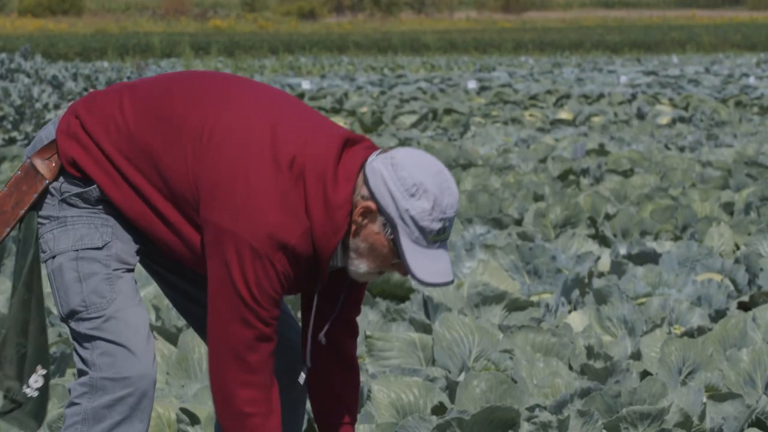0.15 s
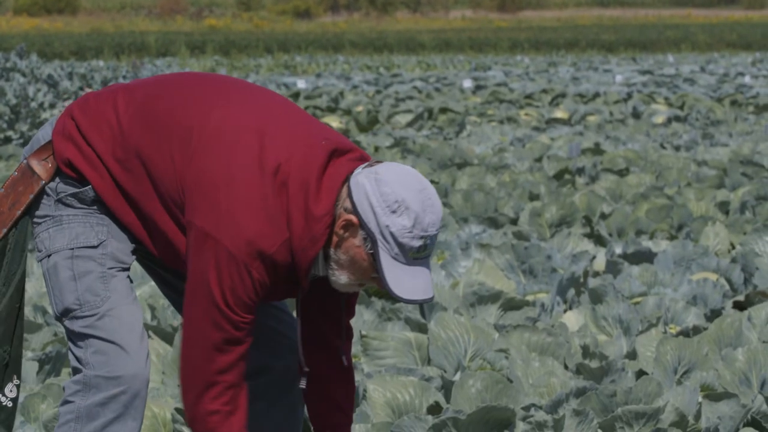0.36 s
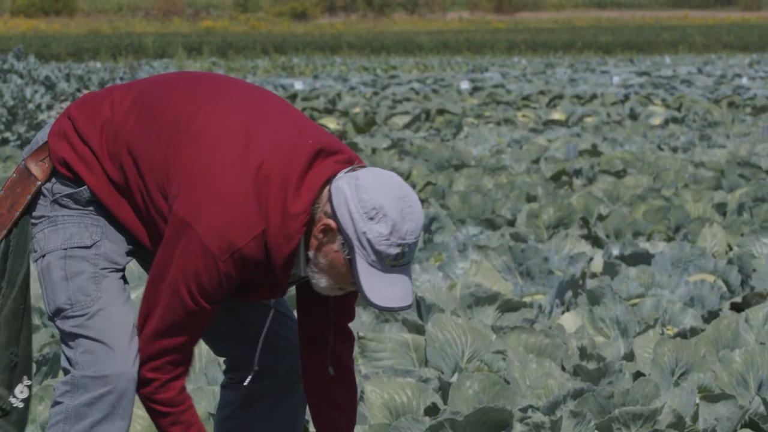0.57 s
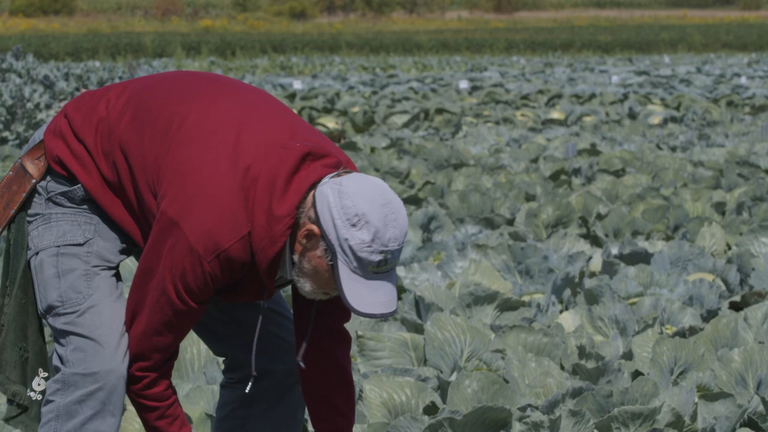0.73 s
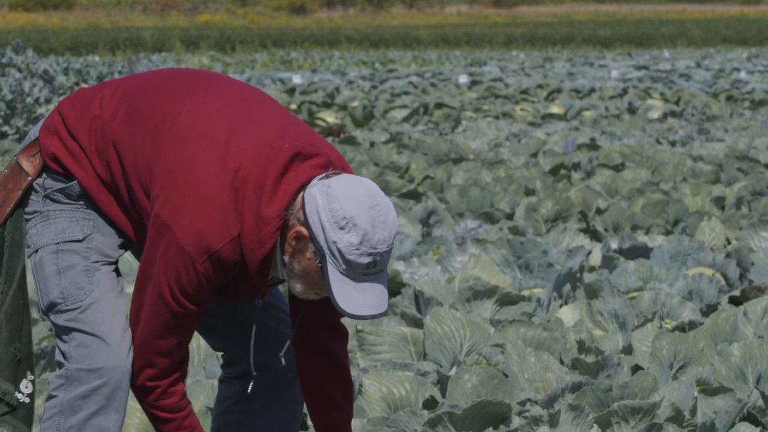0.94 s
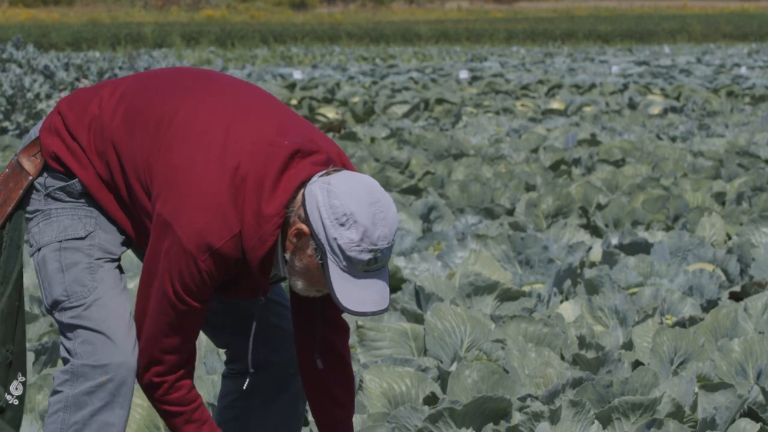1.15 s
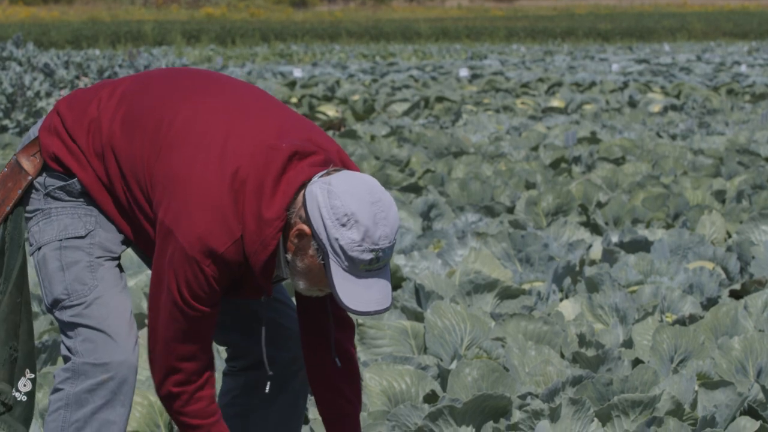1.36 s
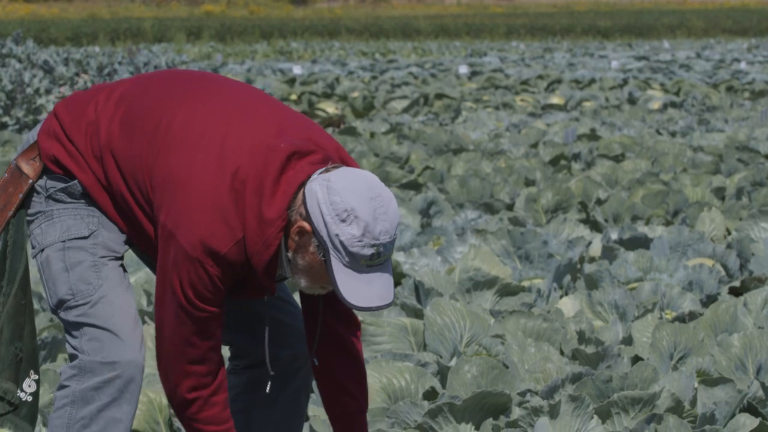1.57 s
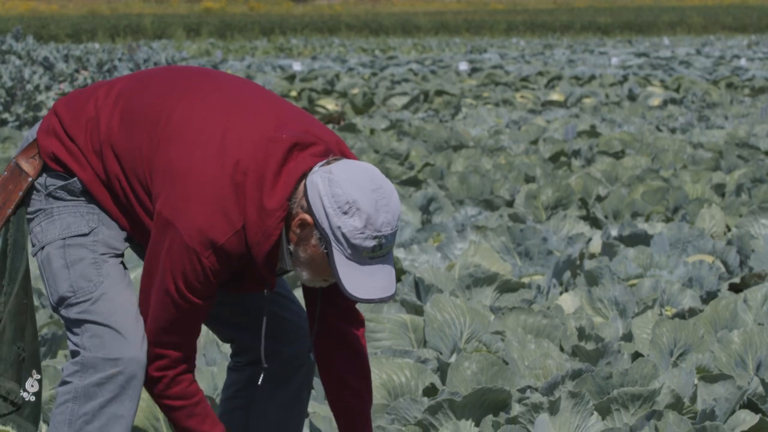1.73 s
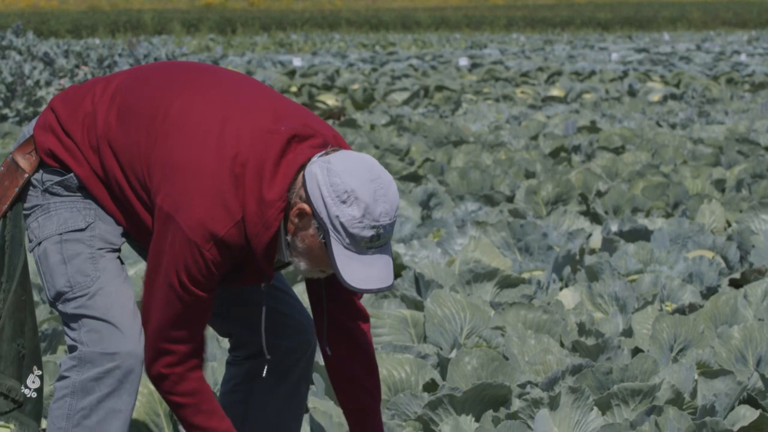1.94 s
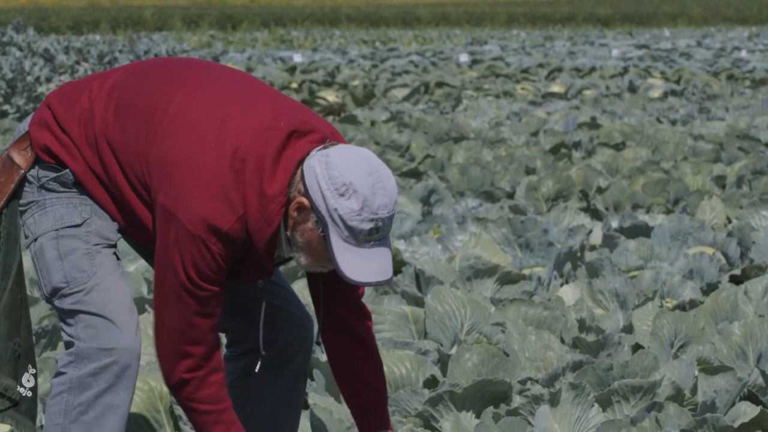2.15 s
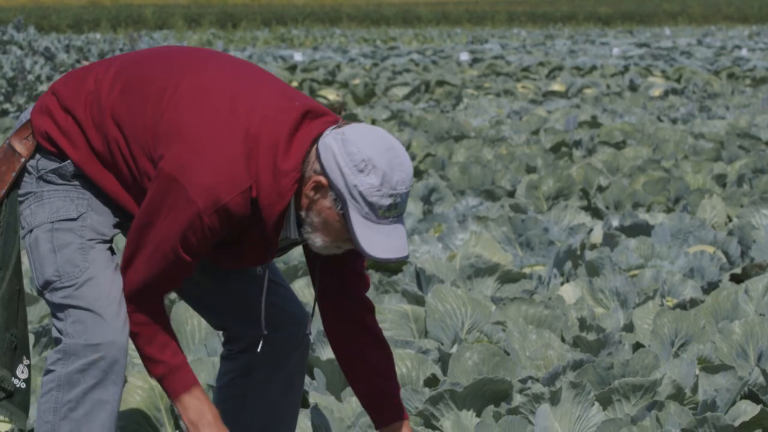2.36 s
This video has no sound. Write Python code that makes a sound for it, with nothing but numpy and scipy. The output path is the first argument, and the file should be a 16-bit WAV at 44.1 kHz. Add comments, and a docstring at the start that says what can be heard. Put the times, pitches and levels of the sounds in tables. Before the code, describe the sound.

Cabbage leaves crackle as a head is pulled, and the stem breaks early with one loud, hollow crack. Soft rubbing and ticks follow, then more crisp snaps and tearing, heard close up in a quiet open field.

```python
"""Pulling a cabbage in an open field

Leaves rub, crackle and tear in a series of pulls; early on, the stem breaks with one hollow crack.
Snapping ribs are crisp bursts that ring their leaf and knock the dense head. Soft ticks, a faint
squeak and a few bright flicks fill the gaps. Foliage and field scatter it all over a bed of quiet air."""
import sys
import numpy as np
from scipy import signal
from scipy.fft import rfft, irfft, next_fast_len
from scipy.io import wavfile
from scipy.ndimage import uniform_filter1d

SR = 44100
rng = np.random.default_rng(int(sys.argv[2]) if len(sys.argv) > 2 else 0)


def log_audio(samples):
    """Write samples as a 16-bit WAV file to the path given in sys.argv[1]."""
    # one column per channel
    frames = np.atleast_2d(samples).T
    # limit to full scale, then quantise
    limited = np.clip(frames, -1, 1)
    pcm = np.round(limited * 32767).astype(np.int16)
    wavfile.write(sys.argv[1], SR, pcm)


N = 105840

# pulls on the leaves: peak_s, rise_s, fall_s, crackle_db, knock_db, treble_db
LEAF_PULLS = [(0.013, 0.16, 0.16, -55.5, -56.5, -8.5), (0.135, 0.05, 0.059, -58.5, -53, -5.5),
              (0.199, 0.062, 0.14, -46, -39, -3), (0.237, .08, 0.21, -44, -39.5, -3.5),
              (0.295, 0.058, 0.048, -44, -54, 6), (0.391, 0.12, 0.23, -56.5, -47.5, 0.5),
              (0.53, .24, 0.13, -47, -55.5, -8), (0.652, 0.089, 0.056, -49.5, -57.5, -8),
              (0.785, 0.25, 0.14, -53, -58.5, -4.5), (1.016, 0.058, 0.079, -56, -81, 1),
              (1.284, 0.074, 0.053, -48.5, -57, -2.5), (1.335, 0.06, 0.092, -41.5, -50, -6),
              (1.4, 0.13, 0.38, -55, -60, -3), (1.606, .105, 0.032, -36.5, -40, 0.5),
              (1.625, 0.032, 0.018, -36, -33.5, 0.5), (1.67, 0.095, 0.12, -50, -50.5, -2),
              (1.757, 0.017, 0.024, -44, -50.5, -5.5), (1.84, 0.019, 0.0316, -39.5, -53, -1.5),
              (1.866, 0.042, 0.063, -37, -39.5, 2), (1.936, 0.056, 0.085, -46.5, -44.5, -6.5),
              (2.029, .18, 0.76, -54, -60, -1.5), (2.112, 0.0055, 0.065, -37.5, -47, 5.5),
              (2.139, 0.024, 0.032, -35.5, -35.5, 0), (2.164, 0.0085, 0.14, -46.5, -40.5, -2.5),
              (2.355, 0.14, 0.19, -57.5, -55.5, -12)]
# ribs that snap: start_s, crack_db, knock_db, leaf_ring_hz, head_pitch_ratio
RIB_SNAPS = [(0.1143, -49.5, -39, 1870, .66), (0.1928, -34.5, -33, 2380, .76), (0.2015, -40, -35, 2780, .8),
             (0.2423, -25.5, -30, 2090, 0.87), (0.342, -38.5, -40.5, 2560, 1.0),
             (1.5634, -35, -40.5, 1710, 0.98), (1.6, -49, -31.5, 1770, 1.06),
             (1.6188, -26, -44, 2260, 0.89), (1.8224, -40.5, -46.5, 1840, 1.15),
             (1.856, -30, -49, 1850, 1.8), (1.8655, -24.5, -48, 1880, 0.97),
             (1.8817, -31, -36.5, 2270, 0.93), (1.927, -34.5, -55, 1770, 1.0),
             (1.9492, -25, -34, 2290, 1.017), (2.1345, -29, -26.5, 1960, 0.72),
             (2.156, -26.5, -31.5, 1680, 0.78), (2.2227, -37, -35.5, 2082, 0.94)]
# leaves that catch and slip: start_s, level_db, leaf_ring_hz
LEAF_TICKS = [(0.178, -40, 2250), (0.5364, -41, 2370), (0.6089, -42.5, 1800), (0.6563, -43, 1770),
              (0.688, -50.5, 2200), (0.7068, -45.5, 2110), (0.7547, -39.5, 1950), (0.7978, -44.5, 3590),
              (1.1312, -45.5, 1770), (1.139, -49.5, 2010), (1.1817, -54, 1750), (1.32, -45, 1680),
              (1.3865, -41, 1970), (1.4617, -46.5, 1820), (1.6928, -43, 1985), (1.9106, -35.5, 2510),
              (2.0937, -36, 2000)]
# the stem giving way: start_s, crack_db, knock_db
STEM_BREAK = (0.2711, -14.5, -10)
# a faint squeak: start_s, length_s, pitch_hz
THIN_SQUEAK = (0.77, 0.2, 3362)
# a stiff leaf edge flicking over another: start_s, level_db
EDGE_FLICKS = [(0.9355, -49), (0.9385, -44), (0.9426, -42), (0.9488, -46.5)]
# resonances of the dense head: pitch_hz, level_db, t60_s
HEAD_MODES = [(246, -19, 0.066), (337, -17.5, .05), (456, -2, 0.033), (587, 7, 0.02), (700, -4, 0.025),
              (920, -6.5, 0.02), (1228, -12, 0.026)]
# EQ curves of air, tearing leaf, shuddering stalk, stem crack and flicks: frequency_hz, relative_db
AIR_EQ = [(48, -26), (85, -1.5), (560, -0.5), (1050, -23), (1750, -3.5), (2500, -16.5), (3600, -9.5),
          (5900, -26), (11700, -23), (16000, -27.5)]
TEAR_EQ = [(100, -40.5), (500, -9), (1000, -9), (1300, -10.5), (1750, -2), (2250, -1.5), (2900, -7.5),
           (3600, -6.5), (4600, -7), (5600, -10.5), (11000, -11.5), (16000, -21)]
SHUDDER_EQ = [(45, -38), (130, -13), (280, 1), (600, -11.5), (2000, -36)]
STEM_EQ = [(100, -44), (700, -5), (1300, -3), (1950, -9), (2500, 3), (3000, -4.5), (3700, -1.5),
           (4400, -10), (6400, -14), (12000, -19.5), (16000, -24.5)]
FLICK_EQ = [(100, -44.5), (1050, -26), (1650, 2.5), (2700, -10.5), (3550, 7.5), (4500, -11), (8500, -16.5),
            (11500, -7.5), (16000, -24)]

PULL_RANGE_DB = 22  # a pull swells this far in rise_s and drops this far in fall_s
FIBRES_PER_S, QUIET_RUB_DB, DOUBLING_DB = 900, -54.5, 13  # the rate doubles per step above a quiet rub
CRACK_ENERGY, KNOCK_ENERGY = 90, 200  # sums of squared samples


def amp(db):
    """Decibels to gain."""
    return 10 ** (np.asarray(db) / 20)


def unit_rms(x):
    """Scales to rms 1."""
    return x / np.sqrt(np.mean(x ** 2) + 1e-20)


def with_energy(x, energy=1):
    """Scales to a given sum of squares."""
    return x / np.linalg.norm(x) * np.sqrt(energy)


def add(mix, start_s, sound):
    """Lays a sound into the mix."""
    part = mix[max(round(start_s * SR), 0):][:len(sound)]
    part += sound[:len(part)]


def equalise(x, curve, size=4096):
    """Minimum-phase EQ of unit energy: shapes the tone and keeps attacks crisp."""
    hz, db = np.transpose(curve)
    bin_hz = abs(np.fft.fftfreq(size, 1 / SR)) + 1
    log_gain = np.log(amp(np.interp(np.log(bin_hz), np.log(hz), db)))
    taps = np.fft.ifft(np.exp(np.conj(signal.hilbert(log_gain)))).real[:size // 2]
    return signal.oaconvolve(x, with_energy(taps))[:len(x)]


def treble_shelf(x, db, corner_hz=4100):
    """Brightens or dulls the top end."""
    hz = np.fft.rfftfreq(len(x), 1 / SR)
    shelf = 1 - 1 / (1 + (hz / corner_hz) ** 4)
    return irfft(rfft(x) * amp(db * shelf), len(x))


def wander(t, step_s=0.01209):
    """A quick random modulator of roughly unit size."""
    return np.interp(t - t[0], np.arange(400) * step_s, rng.standard_normal(400))


def field_air():
    """A steady bed of soft, low noise."""
    return amp(-64.5) * unit_rms(equalise(rng.standard_normal(N), AIR_EQ))


def cell_burst(rise_s, decay_s):
    """A run of cells pops in one tiny burst of noise."""
    t = np.arange(1024) / SR
    envelope = (1 - np.exp(-(t / rise_s) ** 2)) * np.exp(-t / decay_s)
    return with_energy(rng.standard_normal(len(t)) * envelope, CRACK_ENERGY)


def fibre_pop(low_hz=1545, high_hz=2585, width_hz=250):
    """One fibre parts, and the leaf around it rings at a pitch of its own."""
    pop = cell_burst(rise_s=0.00016, decay_s=0.0016)
    hz = low_hz * (high_hz / low_hz) ** (rng.random() ** 2)
    ring = signal.lfilter(*signal.iirpeak(hz, hz / width_hz, SR), pop)
    return with_energy(pop + amp(0.5) * ring)


def head_knock(pitch_ratio, lag_s=0.0016, rise_s=0.00075, low_cut_hz=215.4):
    """The dense head rings briefly in its low modes, just behind the crack."""
    t = np.maximum(np.arange(4096) / SR - lag_s, 0)
    modes = sum(amp(db - 60 * t / t60) * np.sin(2 * np.pi * hz * pitch_ratio * t)
                for hz, db, t60 in HEAD_MODES)
    attack = 1 - np.exp(-t / rise_s)
    low_cut = signal.butter(3, low_cut_hz, "high", fs=SR, output="sos")
    return with_energy(signal.sosfilt(low_cut, modes * attack), KNOCK_ENERGY)


def parting_fibres(t, envelope_db, crackle_db):
    """Fibres part as random impulses, denser the harder the pull, in clumps as leaves catch and slip."""
    chance, strength, polarity = rng.random((3, len(t)))
    effort_db = np.maximum(crackle_db + envelope_db - QUIET_RUB_DB, 0)
    rate = FIBRES_PER_S * 2 ** (effort_db / DOUBLING_DB)
    spread_db = -1.5 * np.log(strength + 0.018)
    impulses = (chance < rate / SR) * amp(spread_db) * np.sign(polarity - 0.5)
    running_rms = np.sqrt(abs(uniform_filter1d(impulses ** 2, 1100)) + 1e-4)
    clump_depth_db = 2.5 * np.minimum(1, amp(QUIET_RUB_DB - crackle_db)) ** 0.5  # hard pulls run smoother
    return impulses / running_rms * amp(envelope_db + clump_depth_db * wander(t))


def pull(peak_s, rise_s, fall_s, crackle_db, knock_db, treble_db, voices=6, loosening_per_s=0.072):
    """One swell of fibres crackles, knocks the head and shakes the stalk; returns start_s and sound."""
    t = np.arange(-rise_s, 2 * fall_s + 0.039, 1 / SR)
    envelope_db = -PULL_RANGE_DB * np.maximum(-t / rise_s, t / fall_s)
    fibres = parting_fibres(t, envelope_db, crackle_db)
    voice_of_fibre = rng.integers(voices, size=len(t))
    crackle, body = np.zeros((2, next_fast_len(len(t))))
    for voice, detune in enumerate(np.linspace(-0.3, 0.3, voices)):
        hits = fibres * (voice_of_fibre == voice)
        pitch_ratio = np.exp(detune - loosening_per_s * peak_s)  # the head rings lower as it comes free
        add(crackle, 0, signal.fftconvolve(hits, fibre_pop()))
        add(body, 0, signal.fftconvolve(hits, with_energy(head_knock(pitch_ratio))))
    crackle = treble_shelf(equalise(crackle, TEAR_EQ), treble_db)
    sound = amp(crackle_db) * crackle + amp(knock_db) * body
    shudder = amp(knock_db - 11) * equalise(fibres, SHUDDER_EQ)
    add(sound, 0, shudder)
    start_s = peak_s - rise_s
    return max(start_s, 0), sound[max(round(-start_s * SR), 0):]


def tearing():
    """Overlapping pulls rub and tear the leaves."""
    out = np.zeros(N)
    for row in LEAF_PULLS:
        add(out, *pull(*row))
    return out


def leaf_crack(rise_s, decay_s, ring_hz, ring_db, ring_decay_s=0.0028):
    """A burst of popping cells rings the piece of leaf that holds them."""
    burst = equalise(cell_burst(rise_s, decay_s), TEAR_EQ)
    t = np.arange(len(burst)) / SR
    envelope = (1 - np.exp(-(t / rise_s) ** 2)) * np.exp(-t / ring_decay_s)
    ring = np.sin(2 * np.pi * ring_hz * t) * envelope
    return with_energy(unit_rms(burst) + amp(ring_db) * unit_rms(ring), CRACK_ENERGY)


def rib_snaps():
    """Each rib cracks, rings its leaf and knocks the head."""
    out = np.zeros(N)
    for start_s, crack_db, knock_db, ring_hz, pitch_ratio in RIB_SNAPS:
        crack = leaf_crack(rise_s=0.0008, decay_s=0.0038, ring_hz=ring_hz, ring_db=-2)
        add(out, start_s, amp(crack_db) * crack)
        add(out, start_s, amp(knock_db) * head_knock(pitch_ratio))
    return out


def leaf_ticks():
    """Leaves slip over each other with soft, dull ticks that leave the head still."""
    out = np.zeros(N)
    for start_s, level_db, ring_hz in LEAF_TICKS:
        tick = leaf_crack(rise_s=0.001, decay_s=0.0032, ring_hz=ring_hz, ring_db=-1.5)
        add(out, start_s, amp(level_db) * tick)
    return treble_shelf(out, db=-5)


def stem_break():
    """The big hit: the thick stem breaks and sets the whole head ringing."""
    start_s, crack_db, knock_db = STEM_BREAK
    crack, body = np.zeros((2, N))
    add(crack, start_s, amp(crack_db) * cell_burst(rise_s=0.00093, decay_s=0.0027))
    add(body, start_s, amp(knock_db) * head_knock(pitch_ratio=0.96))
    return equalise(crack, STEM_EQ) + body


def squeak(harmonics_db=(-66, -75, -82, -71), waver=0.0025):
    """A faint, thin squeak swells and fades on a slightly wavering pitch."""
    start_s, length_s, pitch_hz = THIN_SQUEAK
    t = np.arange(0, length_s, 1 / SR)
    phase = 2 * np.pi * np.cumsum(pitch_hz * (1 + waver * wander(t))) / SR
    tone = sum(amp(db) * np.sin(k * phase) for k, db in enumerate(harmonics_db, 1))
    envelope = np.sin(np.pi * t / length_s) ** 0.5 * np.exp(-t / length_s)
    out = np.zeros(N)
    add(out, start_s, tone * envelope)
    return out


def edge_flicks():
    """A stiff leaf edge flicks over another in a quick run of thin, bright ticks."""
    out = np.zeros(N)
    for start_s, level_db in EDGE_FLICKS:
        add(out, start_s, amp(level_db) * cell_burst(rise_s=0.0008, decay_s=0.0038))
    return equalise(out, FLICK_EQ)


def scatter(x, t60_s, predelay_s):
    """Many weak echoes blend into a dying tail."""
    t = np.arange(SR) / SR
    fade_in = np.clip(t / predelay_s - 1, 0, 1)
    tail = rng.standard_normal(SR) * amp(-60 * t / t60_s) * fade_in
    return signal.fftconvolve(x, with_energy(tail))[:N]


def scene(field_top_hz=1810):
    """The mono mix: dry plant, tight foliage echoes, a dark tail from the field, and air."""
    plant = stem_break() + rib_snaps() + leaf_ticks() + edge_flicks() + squeak() + tearing()
    foliage = treble_shelf(scatter(plant, t60_s=0.075, predelay_s=0.0031), db=-3)
    high_cut = signal.butter(2, field_top_hz, fs=SR, output="sos")
    field = signal.sosfilt(high_cut, scatter(plant, t60_s=0.9, predelay_s=0.016))
    return (plant + amp(-13) * foliage + amp(-25) * field + field_air())[None]


def record(dry, top_hz=15900):
    """A steep high cut across the whole mix."""
    high_cut = signal.firwin(401, top_hz, window=("kaiser", 8), fs=SR)
    return signal.oaconvolve(dry, high_cut[None], "same")


dry = scene()
out = record(dry)
log_audio(out)
```